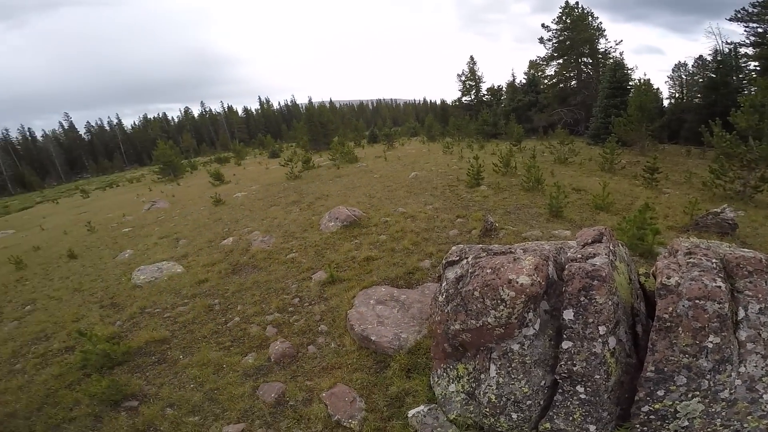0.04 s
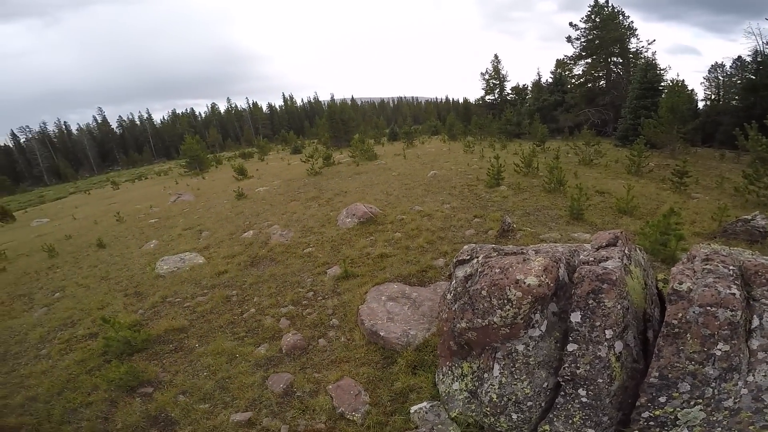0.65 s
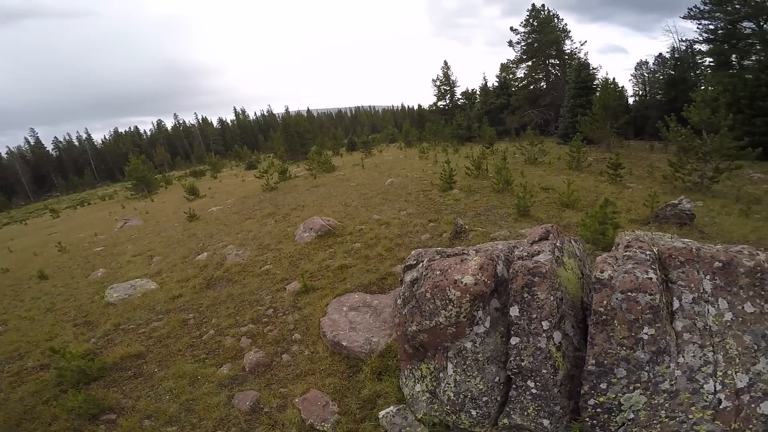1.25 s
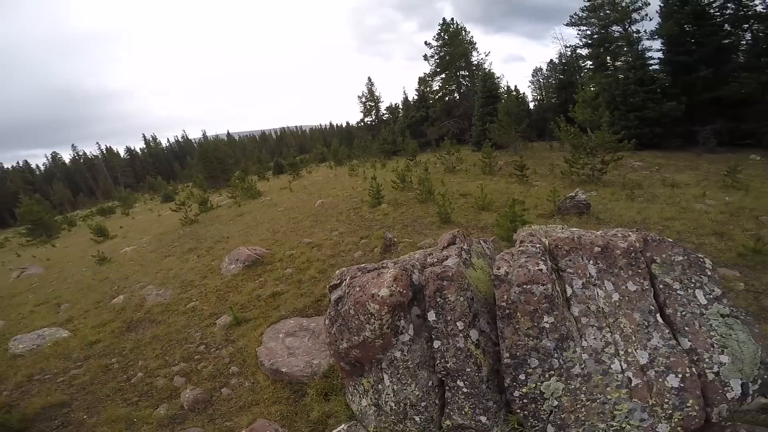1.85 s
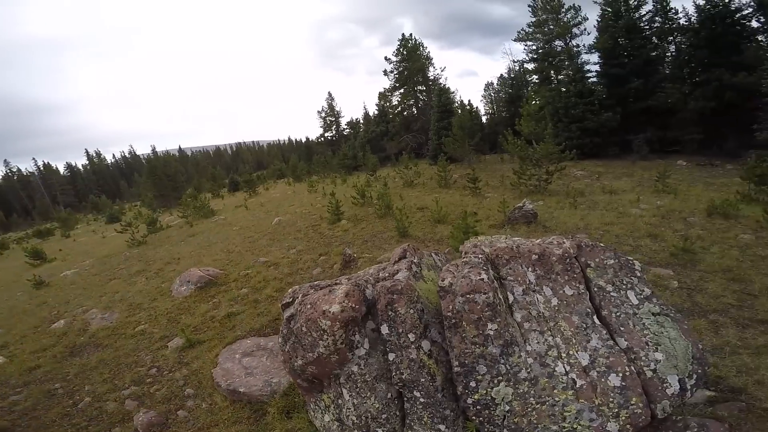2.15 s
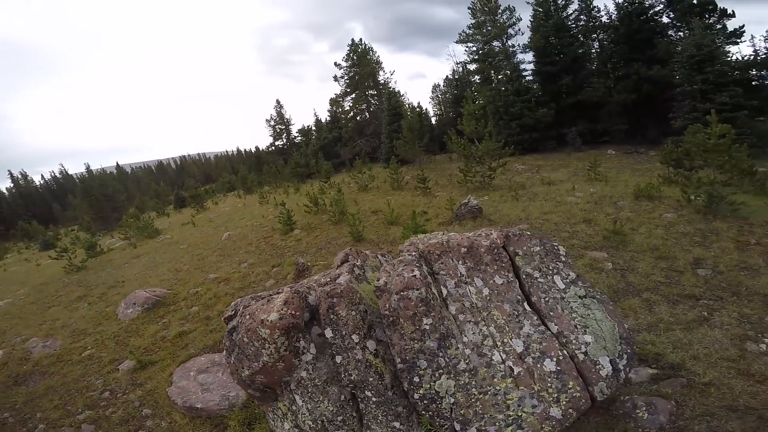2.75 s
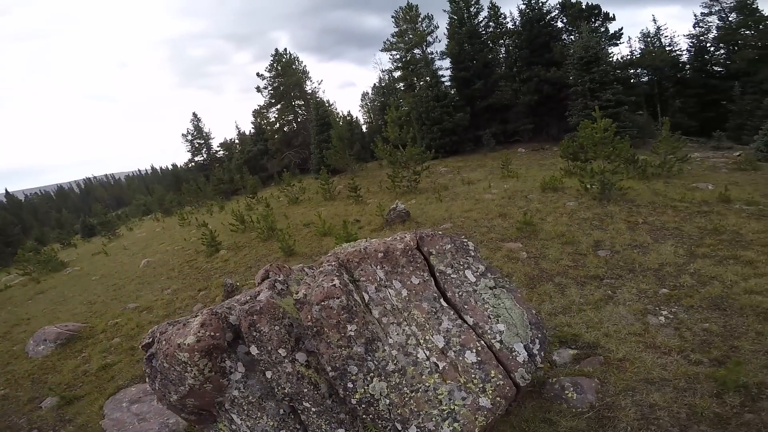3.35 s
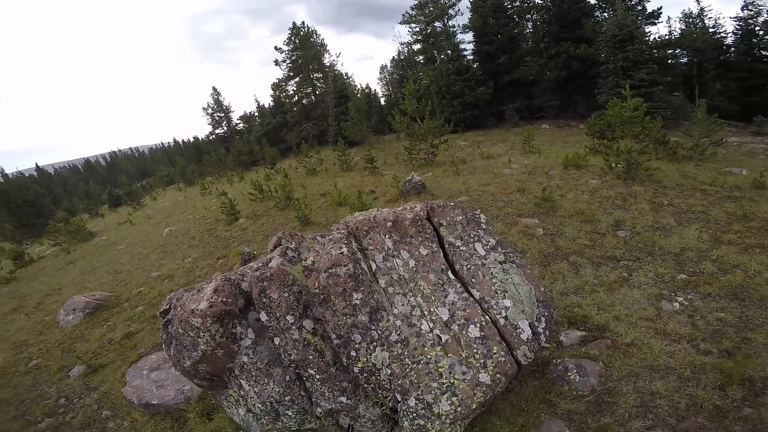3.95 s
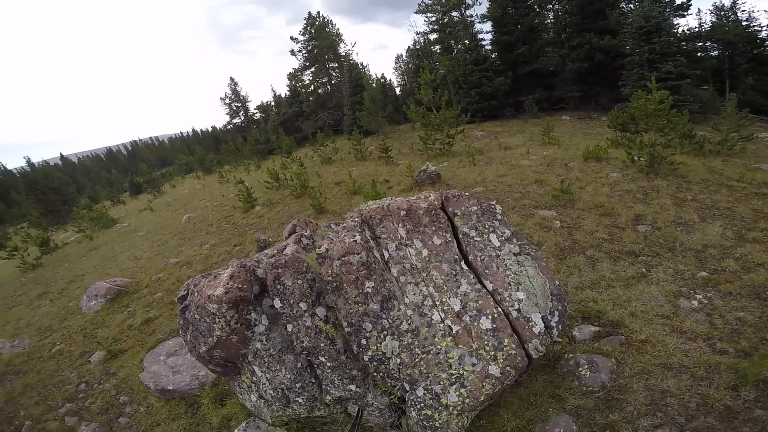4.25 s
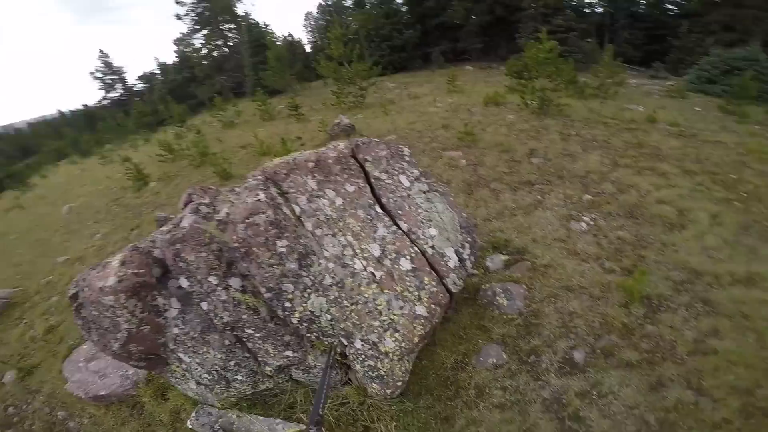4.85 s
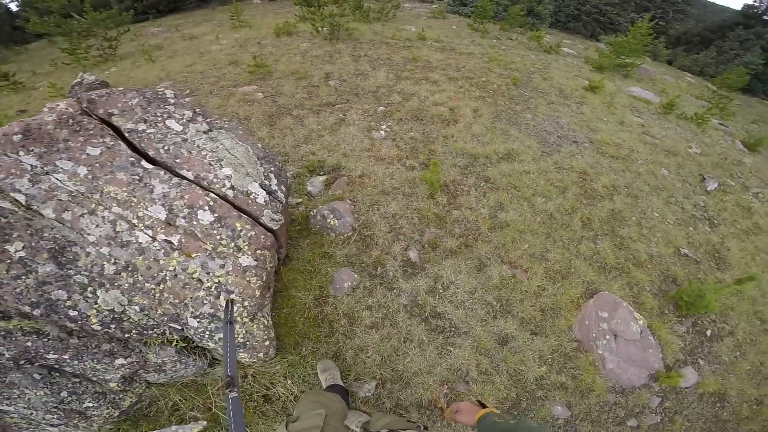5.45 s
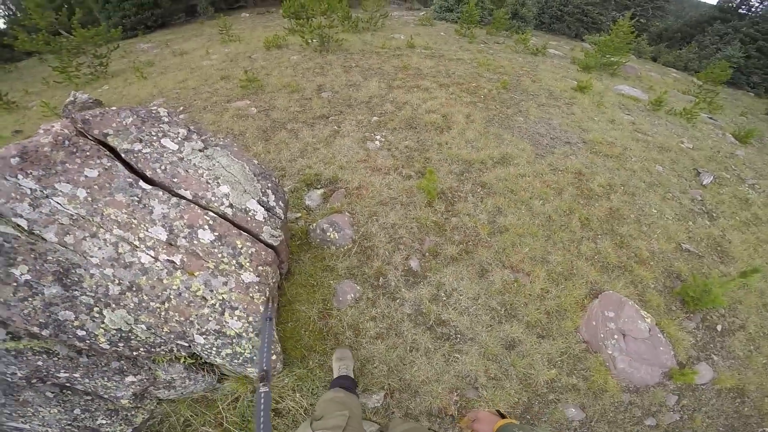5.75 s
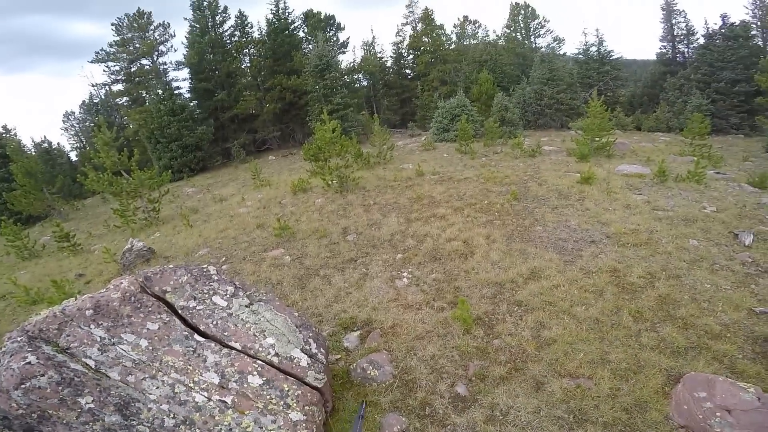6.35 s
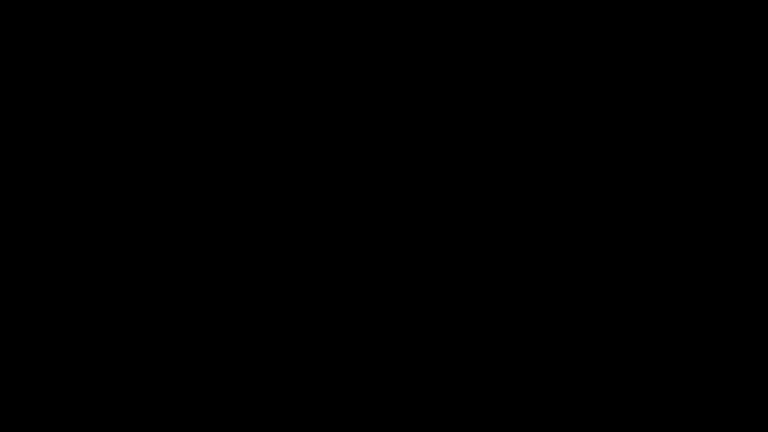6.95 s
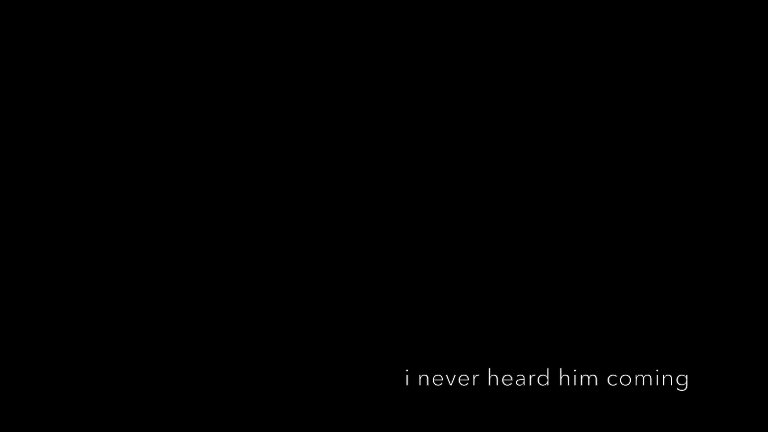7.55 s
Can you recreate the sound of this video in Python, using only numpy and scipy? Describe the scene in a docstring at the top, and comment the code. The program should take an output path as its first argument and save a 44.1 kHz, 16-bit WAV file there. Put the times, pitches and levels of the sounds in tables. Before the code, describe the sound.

A faint hiss of distant air, with a trace of thin electronic whine, lies under uneven low gusts hitting a body-worn microphone in a quiet mountain meadow. Early on come two small clicks and a hollow knock from carried gear. The wind then buffets more firmly, eases around one very soft, brief rustle, and the whole sound fades out.

```python
"""A still, open hillside, heard from a small body-worn camera.
Light gusts buffet the microphone: large eddies rumble, small ones flutter above them.
Underneath lies a bed of faint far air with the camera's own hiss and electronic whine.
Carried gear gives two tiny ticks and one hollow knock, and a turn makes one soft rustle.
At the end everything fades to silence."""
import sys
import numpy as np
from scipy import signal
from scipy.fft import rfft, irfft
from scipy.io import wavfile

SR = 44100
rng = np.random.default_rng(int(sys.argv[2]) if len(sys.argv) > 2 else 0)


def output_pcm(signal):
    """Save a mono or channel-first signal as 16-bit PCM at the path in sys.argv[1].

    Samples are clipped to [-1, 1] before scaling.
    """
    pcm = np.clip(np.atleast_2d(signal).T, -1, 1) * 32767
    wavfile.write(sys.argv[1], SR, np.round(pcm).astype(np.int16))


N = 335601
TIME = np.arange(N) / SR
BINS_HZ = np.fft.rfftfreq(N, 1 / SR)

# Tone of the bed of far air and microphone hiss: frequency_hz, relative_db
HISS_COLOUR = [(30, 13.5), (100, 13), (170, 11.5), (300, 7.5), (600, 5.5), (900, 1.5), (1500, -0.5),
               (3000, -1), (4400, -1.5), (6000, -5.5), (8000, -8.5), (11000, -11), (13800, -10),
               (15200, -14)]
# Thin bands of electronic whine: centre_hz, width_hz, level_over_hiss_db
WHINE_BANDS = [(4755, 91, 1), (9440, 110, 4.5), (12228, 9, -0.5), (13700, 28, 8), (14265, 160, 5)]
# Hollow tone of the rustle: frequency_hz, relative_db
RUSTLE_TONE = [(250, -20), (480, 1), (610, 7), (780, 0), (1300, -21), (3000, -44)]
# Gear clicks, the first two merging into one tick: start_s, peak_db, pitch_ratio
TICK_HITS = [(1.486, -44.5, 1.26), (1.4875, -55, 1.16), (2.3873, -39.5, 1)]
# Ring of a click: pitch_hz, relative_db, t60_s
TICK_RING = [(520, -2, 0.015), (1700, -7, .006), (2840, 0.5, .005), (3900, -7, 0.0042), (4960, -10, 0.0046)]
# The knock and its rebounds, levels before softening: start_s, level_db
KNOCK_HITS = [(2.9246, -36.5), (2.9264, -39.5), (2.9354, -52)]
# Hollow ring of the knock: pitch_hz, relative_db, t60_s
KNOCK_RING = [(485, -16, .02), (550, -7, 0.04), (640, 1, 0.035), (825, 7, 0.017), (1035, -0.5, 0.013),
              (1310, 0, 0.011), (1810, -1, 0.016)]
# Gusts at the microphone: start_s, length_s, rumble_db, flutter_db
GUST_CUES = [(0.0, 0.056, -46, -60), (0.45, 0.067, -52.5, -71), (2.106, 0.14, -49.5, -66),
             (2.247, 0.63, -40, -67.5), (2.926, 0.061, -45, -79), (3.185, 0.3, -48.5, -61.5),
             (3.407, 0.15, -38.5, -52.5), (3.626, 0.49, -49.5, -67), (3.908, 0.72, -37, -53.5),
             (4.025, 0.074, -30.5, -47.5), (4.632, 0.12, -42.5, -72), (4.801, 0.088, -35, -52.5),
             (4.994, 0.11, -46.5, -76), (5.324, 0.2, -38, -56.5), (5.514, 0.13, -34.5, -51.5),
             (5.787, 0.22, -42.5, -66), (6.113, 0.11, -51, -80), (6.418, 0.23, -42.5, -66),
             (6.678, 0.25, -44.5, -57), (7.083, 0.068, -37, -58.5)]
# Deep tone of the large eddies: frequency_hz, relative_db
RUMBLE_COLOUR = [(10, -11.5), (20, 1), (29, 1), (42, -3.5), (55, -14), (72, -29.5), (120, -49), (300, -82)]
# Lighter tone of the small eddies: frequency_hz, relative_db
FLUTTER_COLOUR = [(30, -20), (55, 1), (72, 5), (95, -5), (125, -15.5), (180, -27), (350, -29.5), (600, -35),
                  (1500, -58.5)]
# Single hard thumps of air: centre_s, peak_db, pitch_hz
BUFFET_HITS = [(0.054, -46, 30.2), (2.291, -40, 48.7), (2.533, -35.5, 35), (4.078, -33, 61),
               (5.371, -37.5, 50.3), (5.565, -41, 64.6), (5.651, -30, 43)]


def gain_of(db):
    """Decibels to amplitude."""
    return 10 ** (np.asarray(db) / 20)


def colour(points):
    """An EQ curve: a gain per frequency, joining the points on a log frequency axis."""
    hz, db = np.transpose(points)
    return gain_of(np.interp(np.log(BINS_HZ + 1), np.log(hz + 1), db))


def noise(eq):
    """White noise through an EQ curve, scaled to rms 1."""
    filtered = irfft(rfft(rng.standard_normal(N)) * eq, N)
    return filtered / np.sqrt(np.mean(filtered ** 2) + 1e-20)


def wander(rate_hz):
    """Smooth random drift of rms 1, rolling off above rate_hz."""
    return noise(1 / (1 + (BINS_HZ / rate_hz) ** 4))


def swell(start_s, length_s, rise_s, decay_s):
    """An envelope that rises smoothly to 1, holds to the end of its length, then dies away."""
    t = TIME - start_s
    attack = np.sin(np.pi / 2 * np.clip(t / rise_s, 0, 1)) ** 2
    return attack * np.exp(-np.maximum(t - length_s, 0) / decay_s)


def add(mix, start_s, sound):
    """Lays a sound into the mix at its cue."""
    part = mix[round(start_s * SR):][:len(sound)]
    part += sound[:len(part)]


def hiss(level_db=-63, waver_db=0.29):
    """The bed: far air and microphone hiss, with thin bands of electronic whine standing out."""
    whine_power = sum(gain_of(db) ** 2 * np.exp(-np.log(2) * (2 * (BINS_HZ - hz) / width_hz) ** 2)
                      for hz, width_hz, db in WHINE_BANDS)
    bed = noise(colour(HISS_COLOUR) * np.sqrt(1 + whine_power))
    return bed * gain_of(level_db + waver_db * wander(rate_hz=32))


def rustle(level_db=-70.5):
    """A brief soft rub while turning, with one hollow resonance."""
    stroke = swell(start_s=5.9, length_s=0.16, rise_s=0.032, decay_s=0.031)
    return noise(colour(RUSTLE_TONE)) * gain_of(level_db) * stroke


def tap(modes, peak_db, pitch_ratio=1):
    """A blow sets a few quickly dying modes ringing."""
    t = np.arange(SR // 8) / SR
    ring = sum(gain_of(db - 60 * t / t60_s) * np.sin(2 * np.pi * hz * pitch_ratio * t)
               for hz, db, t60_s in modes)
    return -gain_of(peak_db) * ring / np.abs(ring).max()


def gear(contact_s=0.00036):
    """Carried gear: hard little clicks, and a knock whose softer contact dulls its treble."""
    mix = np.zeros(N)
    for start_s, db, pitch_ratio in TICK_HITS:
        add(mix, start_s, tap(TICK_RING, db, pitch_ratio))
    contact = signal.windows.hann(int(contact_s * SR))
    for start_s, db in KNOCK_HITS:
        add(mix, start_s, np.convolve(tap(KNOCK_RING, db), contact / contact.sum()))
    return mix


def airflow(gusts_db, breeze_db):
    """Strength of the moving air: the gusts add their power to a steady breeze."""
    gusts = (gain_of(db) * swell(start_s, length_s, rise_s=0.051, decay_s=0.071)
             for (start_s, length_s, *_), db in zip(GUST_CUES, gusts_db))
    return np.sqrt(gain_of(breeze_db) ** 2 + sum(gust ** 2 for gust in gusts))


def eddies(strength, tone, levelling_s, flicker_db):
    """Turbulent pressure, levelled so that the gusts carry the swell, with a light flicker on top."""
    pressure = noise(colour(tone))
    window = signal.windows.hann(int(2 * levelling_s * SR))
    power = signal.fftconvolve(pressure ** 2, window / window.sum(), "same")
    levelled = pressure / np.sqrt(np.abs(power) + 1e-6)
    return levelled * strength * gain_of(flicker_db * wander(rate_hz=12))


def buffets():
    """Low thumps, each one eddy passing the microphone port: a push, then a pull."""
    mix = np.zeros(N)
    for centre_s, peak_db, pitch_hz in BUFFET_HITS:
        phase = 2 * np.pi * pitch_hz * (TIME - centre_s)
        mix -= gain_of(peak_db) * phase * np.exp((1 - phase ** 2) / 2)
    return mix


def wind():
    """Wind on the microphone: large eddies rumble, small ones flutter, a few hit as hard buffets."""
    _, _, rumble_db, flutter_db = np.transpose(GUST_CUES)
    rumble_swell = airflow(rumble_db, breeze_db=-60)
    flutter_swell = airflow(flutter_db, breeze_db=-71.5)
    rumble = eddies(rumble_swell, RUMBLE_COLOUR, levelling_s=0.056, flicker_db=1.7)
    flutter = eddies(flutter_swell, FLUTTER_COLOUR, levelling_s=0.054, flicker_db=2.5)
    return rumble + flutter + buffets()


def scene():
    """The mono mix: wind up front, over the hiss bed and the small handling sounds."""
    return (wind() + hiss() + gear() + rustle())[None]


def record(dry):
    """A half-cosine fade to silence, then a steep cut of the highest treble."""
    fade_start_s, fade_length_s, cutoff_hz = 6.614, 0.99, 15270
    fade = np.cos(np.pi / 2 * np.clip((TIME - fade_start_s) / fade_length_s, 0, 1)) ** 2
    low_pass = signal.firwin(1023, cutoff_hz, window=("kaiser", 9), fs=SR)
    return signal.oaconvolve(dry * fade, low_pass[None], "same")


dry = scene()
out = record(dry)
output_pcm(out)
```